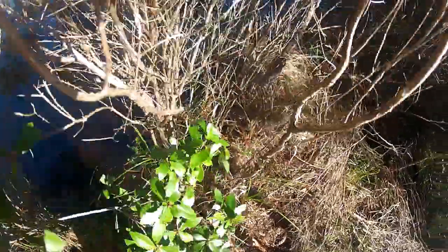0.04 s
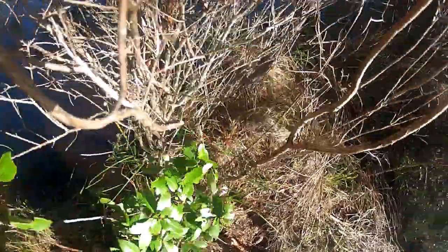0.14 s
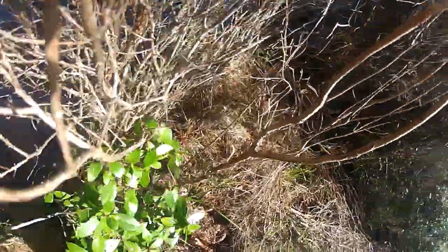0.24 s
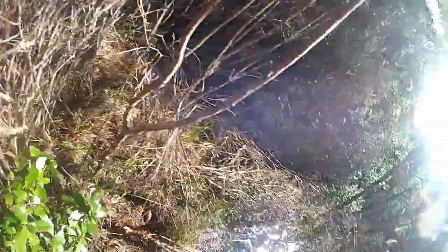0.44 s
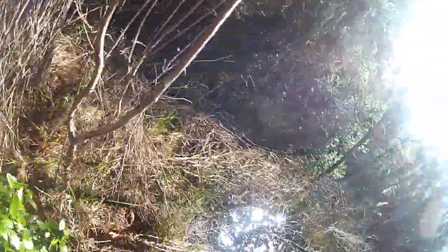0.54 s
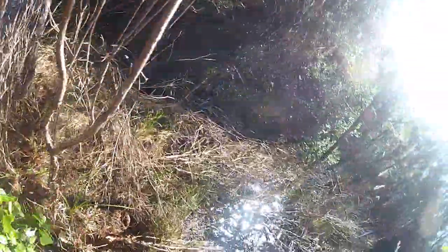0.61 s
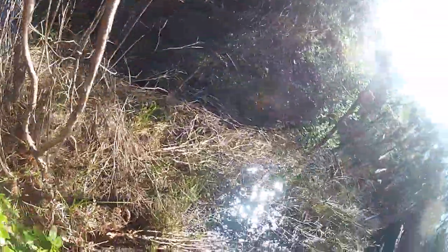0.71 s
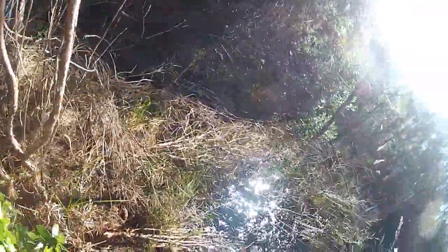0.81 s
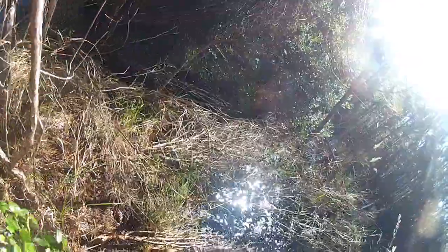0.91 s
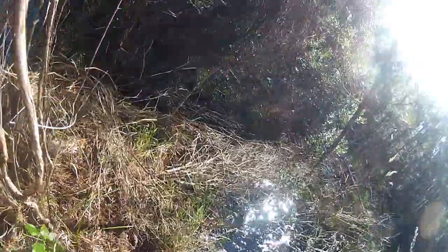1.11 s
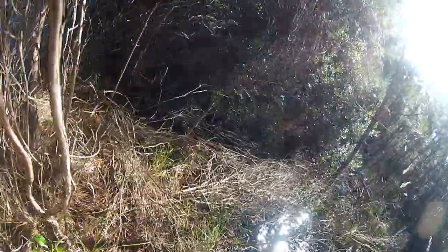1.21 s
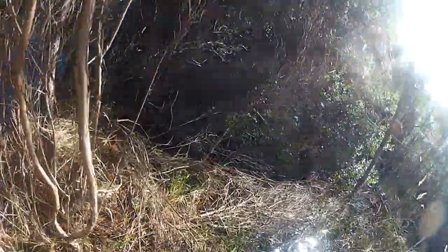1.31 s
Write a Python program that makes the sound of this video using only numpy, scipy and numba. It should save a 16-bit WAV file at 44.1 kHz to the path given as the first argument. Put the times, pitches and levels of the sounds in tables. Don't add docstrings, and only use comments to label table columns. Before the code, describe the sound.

Brittle brush snapping and scraping in a hard close burst, then thinning to ticks in quiet woods

```python
import sys
import numpy as np
from scipy import signal
from scipy.io import wavfile
from scipy.ndimage import uniform_filter1d
from numba import njit

SR = 44100
rng = np.random.default_rng(int(sys.argv[2]) if len(sys.argv) > 2 else 0)


def store_pcm(level_fs):
    pcm = np.round(np.clip(level_fs, -1, 1) * 32767).astype(np.int16)
    wavfile.write(sys.argv[1], SR, np.atleast_2d(pcm).T)


def invert_db(level):
    return 10 ** (np.asarray(level, dtype=float) / 20)


N = 59535
RISE = 0.076


def level(x, db):
    return x * invert_db(db) / np.sqrt(np.mean(x ** 2))


def band(x, hz, width):
    return signal.lfilter(*signal.iirpeak(hz, hz / width, fs=SR), x)


def walk(rate):
    k = int(SR / rate)
    steps = np.repeat(rng.standard_normal(N // k + 1), k)
    return 1.3 * uniform_filter1d(uniform_filter1d(steps, k), k)[:N]


@njit
def ring(n, start, turn, fade, size):
    out = np.zeros(n)
    for k in range(len(start)):
        first = int(np.ceil(start[k]))
        step = np.exp(1j * turn[k] - fade[k])
        z = size[k] * np.exp((1j * turn[k] - fade[k]) * (first - start[k]))
        for i in range(max(first, 0), min(n, first + int(7 / fade[k]))):
            out[i] += z.imag
            z *= step
    return out


def grains(s, hz, t60, size):
    s, hz, t60, size = (1. * a.ravel() for a in np.broadcast_arrays(s, hz, t60, size))
    return ring(N, s * SR, 2 * np.pi * hz / SR, np.log(1000) / (t60 * SR), size)


def soft(s, hz, t60, size, rise):
    onset = t60 * np.clip(rise, .02, .6)
    return grains(s, hz, t60, size) - grains(s, hz, onset, size)


# [f/Hz, level/dB per Hz]
WOOD_SPECTRUM = [(30, -4), (450, 4), (700, 2.5), (1100, -19), (2400, -7), (3200, -23), (4400, -52),
                 (5400, -10)]
WOOD_DB = -49


def wood():
    out, (f, d) = 0, np.array(WOOD_SPECTRUM).T
    for hz in 30 * 2 ** np.arange(0, 7.7, 1 / 3):
        db = np.interp(np.log(hz), np.log(f), d) + 1.1 * walk(23.83)
        noise = band(rng.standard_normal(N), hz, hz / 3)
        out = out + invert_db(db) * band(noise, hz, hz / 3)
    return level(out, WOOD_DB + 1.5)


GRAINS_PER_S = 1300


def scrape(modes):
    out = 0
    for hz, width, db in modes:
        u = rng.random((3, N))
        slips = (u[0] < GRAINS_PER_S / SR) * invert_db(9 * u[1] ** 2) * np.sign(u[2] - .5)
        slips = slips / slips.std() + .5 * rng.standard_normal(N)
        rung = level(band(slips, hz * 1., width), db)
        out = out + rung * invert_db(3.5 * walk(70))
    return level(out, 0)


# [t/s, level/dB, thick stems level/dB, dry leaves level/dB]
PUSH_COURSE = [(0, -47, -10, 2), (0.139, -54, 6.5, 8.5), (0.162, -33, -0.5, 7.5), (.2, -28, -9.5, -9),
               (0.274, -23.5, -4, 4), (0.298, -29.5, -0.5, -13), (0.343, -24.5, -1.5, -4.5),
               (0.368, -18, -11.5, -13), (0.443, -23, -27, -3.5), (0.469, -37, 0.5, -6),
               (.635, -51, 3, 5.5), (.74, -49.5, -0.5, 10.5), (0.799, -48, 12, 2), (0.849, -43, -10, 5),
               (.9, -54, 7.5, 4.5), (1.042, -72.5, 18.5, 10), (1.17, -55, 3.5, 4), (1.35, -56.5, 2.5, 4)]
# [f/Hz, width/Hz, level/dB]
THIN_TWIGS = [(1620, 530, 0.5), (2600, 83, 2.5), (3360, 550, 4), (4160, 71, -2), (2200, 600, -19)]
# [f/Hz, width/Hz, level/dB]
THICK_STEMS = [(377, 290, 2.6), (803, 110, 2.7), (1120, 84, 1.5)]
# [f/Hz, width/Hz, level/dB]
DRY_LEAVES = [(5420, 600, 19), (4200, 2100, -25)]


def scraping(t):
    s, db, thick_db, leaf_db = np.array(PUSH_COURSE).T
    mix = scrape(THIN_TWIGS)
    mix = mix + invert_db(np.interp(t, s, thick_db)) * scrape(THICK_STEMS)
    mix = mix + invert_db(np.interp(t, s, leaf_db)) * scrape(DRY_LEAVES)
    return mix * invert_db(np.interp(t, s, db) - 2 + 1.5 * walk(90))


# [t/s, peak level/dB, f/Hz, tearing
# time/ms]
TWIG_SNAPS = [(.1955, -9, 5350, 1.7), (0.2072, -5.5, 3690, 1.44), (.214, -13, 2674, 15),
              (.2325, -10, 3330, 5.7), (0.2514, 4, 4180, 2.24), (.2655, 0.5, 3660, 1.04),
              (0.2678, -4, 3180, 1.3), (0.271, -4, 3340, 11.5), (.2793, 3, 3995, 1.2),
              (0.2812, 3, 4200, 1.5), (0.3241, -21, 2700, 4.7), (0.352, -8, 2510, 9.1),
              (0.3656, 0, 2570, 3.75), (.372, -4.5, 1785, 4.2), (.381, -2, 1753, 4.9),
              (.3886, 4, 2420, 2.3), (.3888, 2, 4630, 2.9), (.4135, -4.5, 2970, 4.5),
              (.423, -11.5, 2000, 3.5), (0.4353, -6, 3310, 3.5), (0.4455, -1.5, 4200, 3.4),
              (0.48, -22, 2700, 1.45), (.511, -22, 2460, 4.9),
              (.031, -26.5, 4200, 4.4), (.5662, -5.5, 3847, 2.2), (0.5664, -18, 2600, 1.5),
                    (.570, -8, 3740, 5.4), (.578, -7.5, 3840, 3.5), (.585, -15, 3800, 4.8),
                    (.603, -23, 2510, 4.8), (.614, -31, 2200, 3.7), (.650, -9.5, 5400, 4.7),
                    (.656, -15, 2267, 6.9), (.6755, -13.5, 2600, 2.6), (.6803, 3, 4590, 2.18),
                    (.6825, -12, 3200, 2.3), (.6965, -3, 4980, 4.2), (.7015, -13, 2550, 2.5),
                    (0.7087, -10, 5780, 0.82), (.7612, -18, 4850, 2.15), (.765, -18, 2410, 2.9),
                    (.771, -18, 2890, 4.5), (.9665, -26.5, 3800, 1.9), (1.129, -24.5, 2400, 4.9),
                    (1.203, -27.5, 2200, 8), (1.253, -23.5, 2390, 4.6)]
PITCH_CYCLES, SPLINTER_CYCLES = 24.5, 9.7
SPLINTER_DB, SNAP_DB, TEAR_FADE_DB = -4, -8.5, -10


def snaps(table, octaves=0.91, count=7):
    s, db, hz, ms = np.array(table).T[:, :, None]
    u, k = rng.random((len(table), 6, count)), np.arange(count)
    delay = ms / 1000 * (k + u[:, 0] * (k > 0)) / count
    when = s + np.round(delay * hz) / hz
    size = invert_db(db + SNAP_DB + TEAR_FADE_DB * k / count - 1.8 * (k == 0) - 6.8 * u[:, 1])
    own = hz * (1 + 0.2 * (u[:, 2] - .5))
    out = soft(when, own, PITCH_CYCLES / own, size, RISE)
    splinter_size = size * invert_db(SPLINTER_DB) * np.sign(u[:, 4] - .5)
    below = hz / 2 ** (octaves * u[:, 3])
    above = hz + (np.minimum(hz * 2 ** octaves, 5900) - hz) * u[:, 5]
    for splinter in (below, above):
        out = out + grains(when, splinter, SPLINTER_CYCLES / splinter, splinter_size)
    return out


# [t/s, peak level/dB, f/Hz, bounce delay/ms]
STEM_TAPS = [(0.031, -44, 710, 3.8), (0.241, -9, 930, 1.25), (0.2912, -17, 854, 2.3),
             (0.329, -20.5, 472, 2.2), (.389, -7, 860, 2.15), (.395, -16, 843, 2.76), (0.425, -39, 920, 2),
             (.567, -14, 1073, 4.2), (0.584, -18, 894, 2.06), (.648, -21.5, 1140, 8.9),
             (0.7224, -16, 873, 2.6), (0.7614, -13.5, 1236, 2.5), (0.9115, -24.5, 680, 4.14),
             (0.958, -25.5, 1003, 2.06), (1.035, -40, 1142, 21), (1.084, -33, 1132, 2.8),
             (1.129, -27, 1070, 3.05), (1.201, -33, 1050, 6.8), (1.245, -30, 737, 4.3),
             (1.257, -34, 434, 8.5)]
# [ratio to its pitch, level/dB]
STEM_MODES = [(0.972, -1), (0.63, -28), (2.02, -11.5), (2.86, -8.5)]
TAP_CYCLES = 10


def taps():
    s, db, hz, ms = np.array(STEM_TAPS).T[:, :, None]
    ratio, mode_db = np.array(STEM_MODES).T
    weaker = mode_db < mode_db.max()
    spread = 0.12 * (rng.random((len(STEM_TAPS), len(ratio))) - .5) * weaker
    pitch = hz * ratio * (1 + spread)
    bounce = np.round(ms / 1000 * hz) / hz
    out = 0
    for lag, lag_db in ((0, -2), (bounce, -2.5)):
        out = out + soft(s + lag, pitch, TAP_CYCLES / pitch, invert_db(db + mode_db + lag_db), RISE)
    return out


AFTER_DB, AFTER_S = -15, 0.011


def crumbs(table, count=24):
    s, db, hz, ms = np.array(table).T[:, :, None]
    u = rng.random((len(table), 3, count))
    when = s + ms / 1000 + AFTER_S * u[:, 0]
    pitch = np.clip(hz * 2 ** (1.14 * (u[:, 1] - .6)), 300, 5800)
    size = invert_db(db + AFTER_DB - 12.9 * u[:, 0] - 10.8 * u[:, 2])
    return grains(when, pitch, 12 / pitch, size)


# [t/s, peak level/dB]
FIRST_BREAK = [
    (0.1447, -4.5),
]
# [f/Hz, level/dB, t60/s]
FIRST_TWIG_MODES = [(1103, -6.5, 0.055), (3424, -2, 0.026), (3800, 0.5, 0.0096), (4380, -1, 0.024),
                    (5360, 3, 0.011), (2640, -17, 0.053), (1840, -8, 0.014)]


def clean_break():
    (s, db), (hz, mode_db, t60) = FIRST_BREAK[0], np.array(FIRST_TWIG_MODES).T
    fibres = np.array([[0, -4.5], [.0008, -10.5], [.0035, -13.5]])  # delay/s, level/dB
    return soft(s + fibres[:, :1], hz, t60, invert_db(db + fibres[:, 1:] + mode_db), RISE / 2)


# [t/s, peak level/dB, length/ms]
CASE_KNOCKS = [
    (0.147, -17, 2.5),
    (0.2815, -18.5, 2.1),
    (0.3905, -18, 2.2),
    (0.568, -38, 2.2),
    (0.6805, -8.5, 3.44),
    (0.765, -28, 5.7),
]


def knocks():
    s, db, ms = np.array(CASE_KNOCKS).T
    return grains(s - ms / 2000, 600 / ms, 3 * ms / 1000, invert_db(db - 0.5))


# [t/s, peak level/dB, f/Hz]
BARK_TICKS = [(0.2078, -25, 3530), (0.2143, -18.5, 2540), (0.235, -9.5, 3570), (0.2417, -15, 3200),
              (0.2424, -17, 1910), (0.2509, -26, 3120), (0.2517, -23, 3900), (0.2517, -11, 5070),
              (0.2729, -8, 3340), (0.2791, -9, 3910), (0.2794, -6, 2960), (0.2804, -0.5, 5230),
              (0.2811, -16.5, 860), (0.2913, -10.5, 850), (0.2926, -15.5, 1740), (0.325, -15, 1420),
              (0.329, -21, 597), (0.33, -20, 1550), (0.3534, -16, 3120), (0.3594, -11, 1440),
              (0.3617, -17, 3620), (0.3617, -25, 2740), (0.3634, -10.5, 1790), (0.3664, -20.5, 2540),
              (0.3667, -10, 1810), (0.3682, -12.5, 3360), (0.3736, -7.5, 2200), (0.3851, -8, 2530),
              (0.3889, -9, 3460), (0.3889, 0.5, 2518), (0.3891, -16, 946), (0.3946, -14, 818),
              (0.3951, -11, 1700), (0.4141, -20, 3060), (0.4228, -11, 1890), (0.425, -19, 825),
              (0.436, -10, 4870), (0.4363, -11, 2680), (0.446, -19, 2700), (0.5665, -9.5, 5460),
              (0.5665, -28, 1080), (0.5667, -30, 3640), (0.5784, -14.5, 5540), (0.5804, -24, 990),
              (0.5857, -21.5, 4260), (0.6805, -4.5, 4130), (0.6814, -18.5, 1900), (0.6822, -11.5, 3410),
              (0.6827, -17, 2290), (0.6864, -21, 1140), (0.7638, -22, 970), (0.7645, -26.5, 2420),
              (0.77, -25, 660), (0.8423, -32.5, 620), (0.9114, -33, 720), (0.9593, -22.5, 980),
              (1.0371, -34.5, 950), (1.1344, -35, 790), (1.2606, -38.5, 595), (1.2689, -44, 620)]
TICK_CYCLES, TICK_MIN_S, TICK_RISE = 8.4, 0.0062, 0.24


def ticks():
    s, db, hz = np.array(BARK_TICKS).T
    t60 = TICK_MIN_S + TICK_CYCLES / hz
    return soft(s, hz, t60, invert_db(db + 3.5), TICK_RISE)


# [t/s, length/s, level/dB, f/Hz]
BRANCH_RUSTLES = [(.311, 0.021, -22, 1290), (.405, .026, -28.5, 840), (.423, .007, -20, 4670),
                  (.445, 0.0048, -17.5, 4810), (.598, 0.021, -36, 1050), (.643, 0.027, -33, 1020),
                  (.645, 0.017, -32, 2400), (.706, 0.031, -30, 1050), (.709, 0.022, -31, 2460),
                  (.772, 0.021, -35.5, 1010), (1.016, 0.06, -39, 1270), (1.196, .024, -49, 900),
                  (1.235, .004, -38.5, 5260), (1.291, .005, -50, 5400)]


def rustles(count=16):
    s, length, db, hz = np.array(BRANCH_RUSTLES).T[:, :, None]
    u = rng.random((len(BRANCH_RUSTLES), 3, count))
    when = s + length * (np.arange(count) + u[:, 0]) / count
    pitch = np.minimum(hz + 600 * (u[:, 1] - .5), 5800)
    return soft(when, pitch, 0.004 + 8 / pitch, invert_db(db + 3.5 - 10.5 * u[:, 2]), 0.12)


# [t/s, f/Hz, level/dB]
STEM_CREAK = [
    (1.044, 616, -59),
    (1.07, 686, -48),
    (1.1, 755, -52),
    (1.126, 730, -45),
    (1.16, 590, -70),
]


def creak(t):
    s, hz, db = np.array(STEM_CREAK).T
    edge = np.clip(np.minimum(t - s[0], s[-1] - t) / 0.012, 0, 1)
    phase = 2 * np.pi * np.cumsum(np.interp(t, s, hz)) / SR
    return np.sin(phase) * invert_db(np.interp(t, s, db)) * edge


def scene():
    t = np.arange(N) / SR
    all_snaps = TWIG_SNAPS
    mono = clean_break() + snaps(all_snaps) + taps() + ticks()
    mono = mono + crumbs(all_snaps + STEM_TAPS) + knocks()
    mono = mono + scraping(t) + creak(t) + wood() + rustles()
    return np.array([mono, mono])


def top_cut(x):
    return signal.sosfilt(signal.butter(12, 16510, fs=SR, output="sos"), x)


RUMBLE_CUT_HZ, TOP_HZ = 45, 15250
OVERLOAD, DRIFT_HZ, DRIFT_DB, SIDE_DB = 0.28, 300, -10.5, -41


def filtered(x, design):
    return signal.sosfilt(design, x)


def record(dry):
    x = filtered(dry[0], signal.butter(5, 5750., fs=SR, output="sos"))
    x = filtered(x, signal.butter(1, RUMBLE_CUT_HZ, "high", fs=SR, output="sos"))
    slow = signal.resample_poly(x, 40, 147)
    held = signal.resample_poly(np.repeat(slow, 4), 147, 160)[:N]
    smooth = filtered(held, signal.ellip(8, .3, 70, TOP_HZ, fs=SR, output="sos"))
    x = np.tanh(.8 * smooth) / .8
    bass = signal.butter(1, [30, DRIFT_HZ], "band", fs=SR, output="sos")
    rumble = uniform_filter1d(np.abs(x), 2000) * rng.standard_normal(N)
    rumble = filtered(rumble, signal.butter(2, 500, fs=SR, output="sos"))
    excess = np.maximum(np.abs(x) - OVERLOAD, 0)
    side = invert_db(DRIFT_DB + 5.0) * filtered(excess, bass)
    side = side + invert_db(SIDE_DB + 19.0) * filtered(rumble, bass)
    return top_cut(np.array([x - side, x + side]))


dry = scene()
out = record(dry)
store_pcm(out)
```